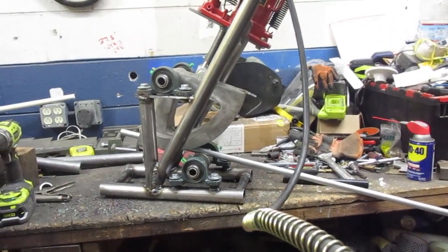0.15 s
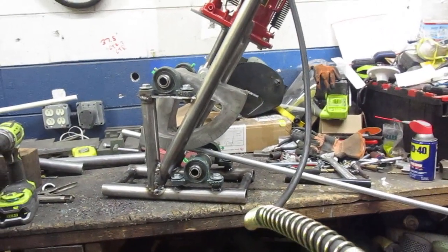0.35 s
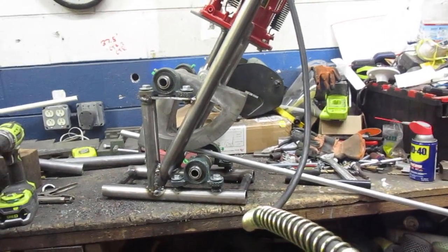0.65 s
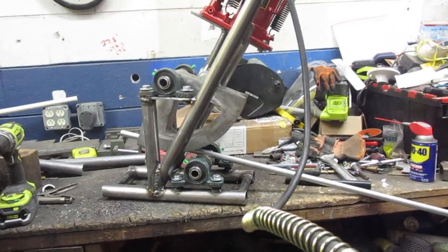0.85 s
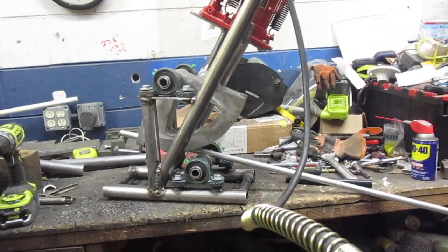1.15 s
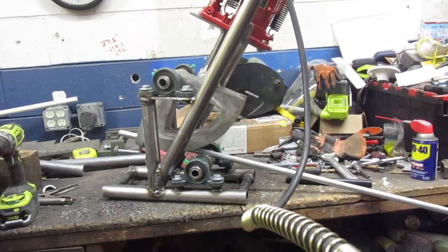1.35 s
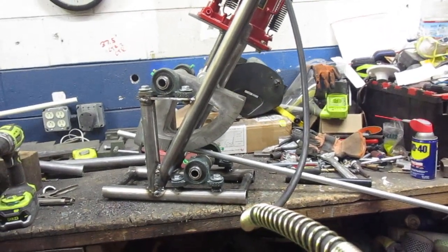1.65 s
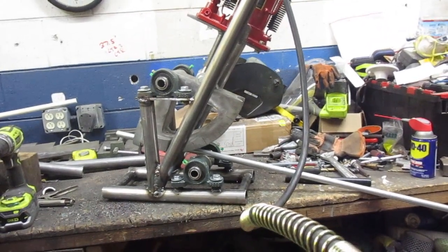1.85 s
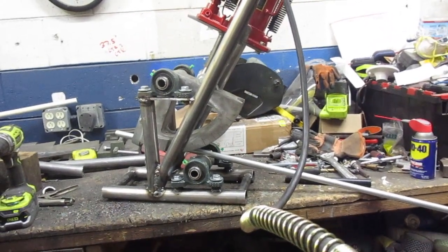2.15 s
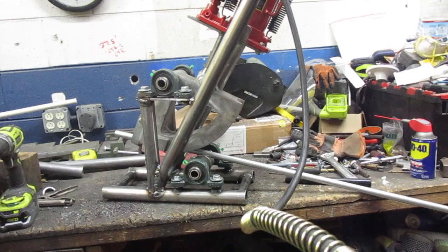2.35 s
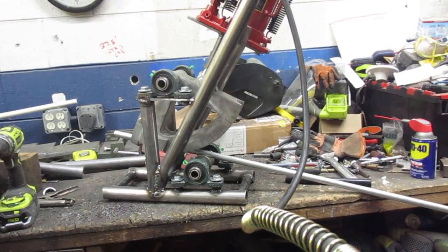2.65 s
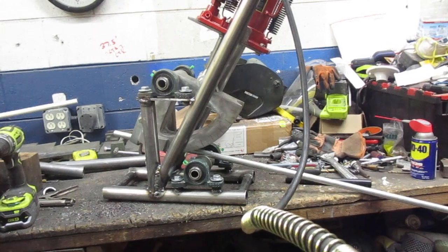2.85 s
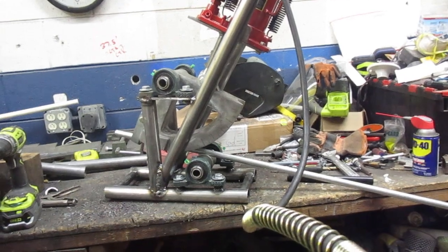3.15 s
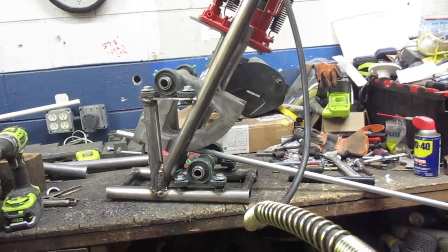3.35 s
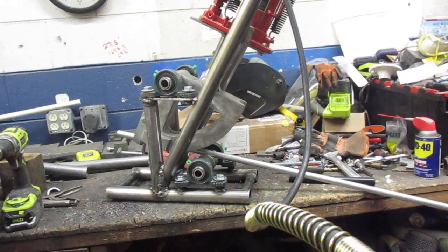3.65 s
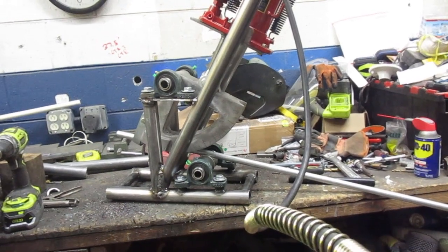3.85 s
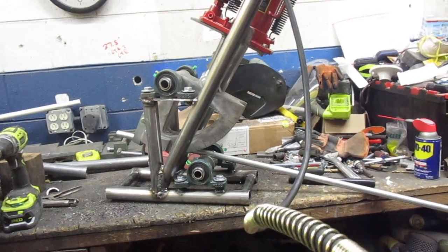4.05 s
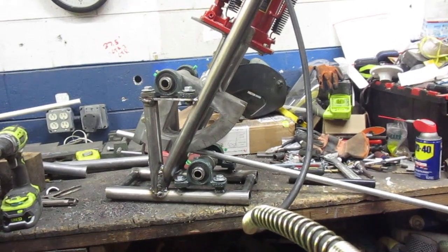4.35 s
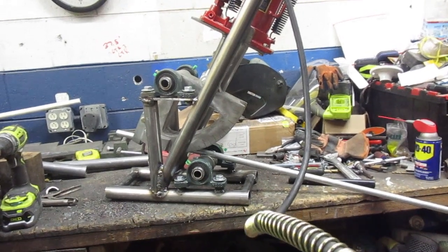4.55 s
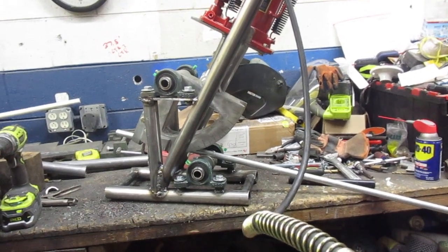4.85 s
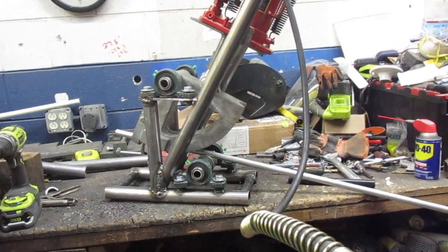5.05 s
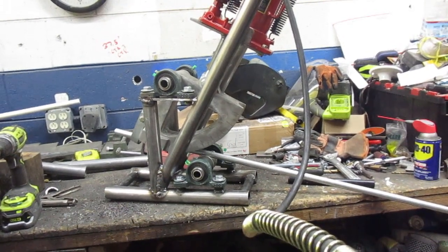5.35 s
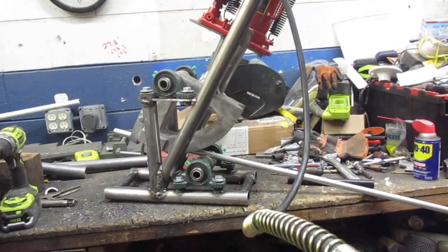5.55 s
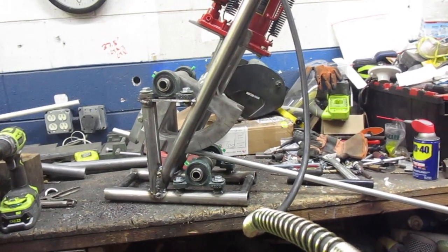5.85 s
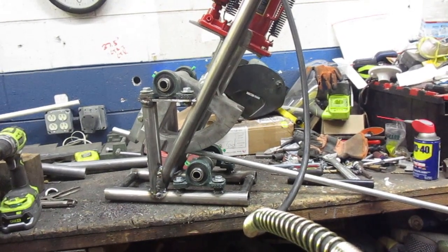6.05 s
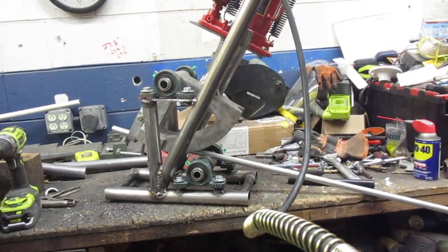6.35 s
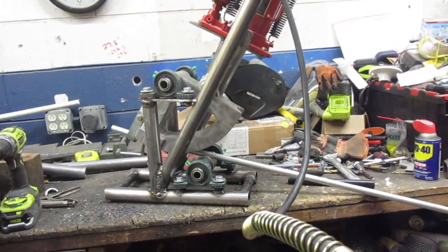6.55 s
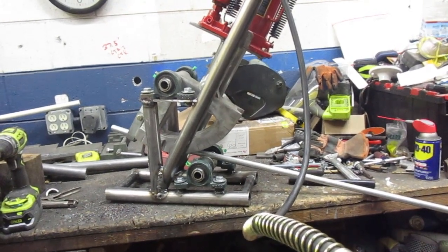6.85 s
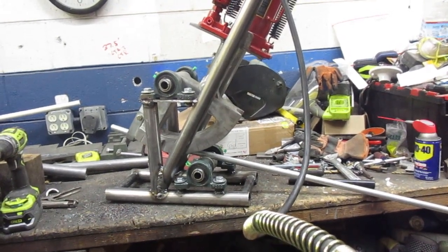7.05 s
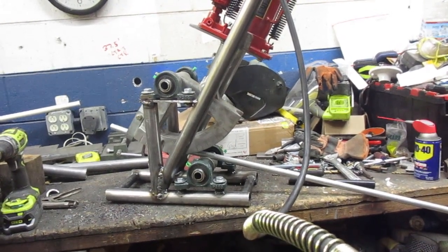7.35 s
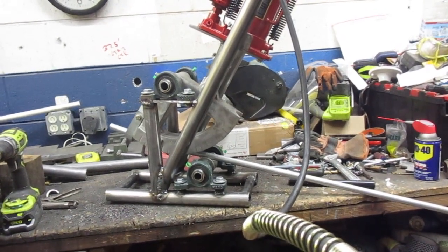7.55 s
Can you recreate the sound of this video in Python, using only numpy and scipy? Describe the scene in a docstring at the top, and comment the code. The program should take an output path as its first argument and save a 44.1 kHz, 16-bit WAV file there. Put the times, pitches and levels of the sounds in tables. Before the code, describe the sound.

An air-driven hydraulic jack pushes steel tube through a bender, firing about fifteen sharp bursts of hiss a second, each with a low thump and light metallic knocks. A valve hisses with a faint, breathy whistle underneath. Just past halfway the pumping stops for a moment, then restarts at nearly the same pace. The workshop reverberates, and spent air buffets the microphone in irregular low puffs.

```python
"""Rapid, thumping bursts of hiss, 15 a second: an air-over-hydraulic jack pushes steel tube through a bender.
Each stroke of its air piston booms, dumps a jet of air and knocks at both ends of its travel.
The feed valve hisses and whistles while the trigger is held; just after 4 s it is let go for a moment.
The workshop reverberates, and spent air drifts over the microphone and buffets it."""
import sys
import numpy as np
from scipy import signal
from scipy.fft import rfft, irfft, next_fast_len
from scipy.io import wavfile

SR = 44100
rng = np.random.default_rng(int(sys.argv[2]) if len(sys.argv) > 2 else 0)


def log_audio(samples):
    """Write samples as a 16-bit WAV file to the path given in sys.argv[1]."""
    # one column per channel
    frames = np.atleast_2d(samples).T
    # limit to full scale, then quantise
    limited = np.clip(frames, -1, 1)
    pcm = np.round(limited * 32767).astype(np.int16)
    wavfile.write(sys.argv[1], SR, pcm)


N = 339570
T = np.arange(N) / SR


def amp(db):
    return 10 ** (np.asarray(db) / 20)


def unit_rms(x):
    return x / np.sqrt(np.mean(x ** 2) + 1e-20)


def curve(rows, t):
    return np.interp(t, *np.transpose(rows))


def log_curve(rows, hz):
    f, value = np.transpose(rows)
    return np.interp(np.log(hz + 1), np.log(f + 1), value)


def add(mix, start_s, sound):
    start = round(start_s * SR)
    sound = sound[max(-start, 0):]
    part = mix[max(start, 0):][:len(sound)]
    part += sound[:len(part)]


def noise(spectrum):
    """Noise of rms 1, shaped by rows of f/Hz, level/dB."""
    size = next_fast_len(N)
    gain = amp(log_curve(spectrum, np.fft.rfftfreq(size, 1 / SR)))
    return unit_rms(irfft(rfft(rng.standard_normal(size)) * gain, size)[:N])


def lowpass(x, hz, order=2):
    return signal.sosfilt(signal.butter(order, min(hz, SR / 2 - 1), fs=SR, output="sos"), x)


def flutter(hz):
    """Random wavering of rms 1, up to the given rate."""
    return unit_rms(lowpass(rng.standard_normal(N), hz))


def ring(modes, detune=0):
    """Decaying modes after one blow; where it lands shifts them slightly."""
    t = np.arange(SR // 4) / SR
    shifts = 1 + detune * rng.standard_normal(len(modes))
    return sum(amp(db - 60 * t / t60) * np.sin(2 * np.pi * hz * shift * t)
               for (hz, db, t60), shift in zip(modes, shifts))


def eddy(t, hz, phase, order=3):
    """One swirl of pressure passing the microphone: about one cycle, energy 1."""
    wave = (np.exp(1j * phase) / (1 + 2j * np.pi * hz * t / order) ** order).real
    return wave / np.linalg.norm(wave)


# trigger pulls: start/s, stop/s
TRIGGER_PULLS = [(0.005, 4.11), (4.5074, 7.69)]
# piston pace: t/s, rate/Hz
STROKE_RATE = [(0, 15.356), (0.7, 15.379), (1.5, 15.46), (4, 15.512), (5.4, 15.158), (7.7, 15.18)]
# driving air pressure: t/s, level/dB
DRIVE_PRESSURE = [(0, 1.5), (.18, -0.8), (.55, 1.5), (.87, -1), (1.2, 1.5), (1.45, 0.5), (1.95, 1.1),
                  (2.65, -0.6), (3.42, 1.25), (3.95, 0.6), (4.1, -1), (4.72, .5), (4.92, -0.8), (5.6, 1.2),
                  (5.9, -2), (6.43, 0.8), (6.72, -1.1), (7.35, 1.2)]
def piston_strokes(scatter_db=0.44):
    """Rows of t/s, level/dB: the piston cycles while the trigger is held, as hard as it is driven."""
    times = []
    for s, stop in TRIGGER_PULLS:
        while s < stop:
            times.append(s)
            s += 1 / curve(STROKE_RATE, s)
    levels_db = curve(DRIVE_PRESSURE, times) + scatter_db * rng.standard_normal(len(times))
    return list(zip(times, levels_db))


# port outflow after opening, typical stroke: t/s, level/dB
PORT_FLOW = [(0, -6), (.0012, -2), (.003, 2.5), (.01, 1), (.02, -0.5), (.027, -5), (.034, -8.5),
             (.045, -53), (.064, -40)]
# jet spectrum: f/Hz, level/dB
JET_SPECTRUM = [(150, -34.5), (500, -14.5), (900, -12.5), (1300, -8), (2000, -5), (2900, -5.5), (3900, -7),
                (5200, -2), (7000, 1.5), (8200, -1), (9800, -6.5), (11000, -0.5), (11800, -2), (12500, -7),
                (15000, -9)]
# lift of the jet's low band: t/s, level/dB
LOW_BAND_LIFT = [(0, 0), (1, -1), (2, -0.5), (3, -1), (4, -1), (4.6, -1.5), (5.5, 2), (6.3, 1.5), (6.9, 2),
                 (7.3, 3), (7.7, 0)]
def exhaust(strokes, level_db=-17, split_hz=3300, lag_s=0.0021, kick_db=7, kick_s=0.0068, snap_db=2.0):
    """Each stroke dumps the cylinder: a turbulent jet that starts sharply and sags as pressure falls."""
    t, flow = np.arange(int(.07 * SR)) / SR, np.zeros(N)
    rested = np.diff([0] + [s for s, db in strokes]) > .2
    draws = rng.standard_normal((len(strokes), 2))
    for (s, db), fresh, (speed, snap) in zip(strokes, rested, draws):
        # the port opens more or less abruptly; after a rest the hose holds full pressure
        onset_db = (snap_db * snap + fresh * kick_db) * np.exp(-t / kick_s)
        add(flow, s, amp(db + onset_db + curve(PORT_FLOW, t * np.exp(0.021 * speed))))
    jet = noise(JET_SPECTRUM)
    low_band = lowpass(lowpass(jet, split_hz)[::-1], split_hz)[::-1]  # zero phase
    slow_flow = lowpass(flow, 1 / (2 * np.pi * lag_s), order=1)  # large eddies take longer to form
    bursts = (jet - low_band) * flow + low_band * slow_flow * amp(curve(LOW_BAND_LIFT, T))
    return bursts * amp(level_db + 0.7 * flutter(hz=430))


# modes of jack, bench and room: f/Hz, level/dB, t60/s
RECOIL_MODES = [(62, -33, .15), (96, -29, .15), (118.6, 4.5, 0.36), (171.1, -7, 0.31), (200, 0, 0.086),
                (253, -5, 0.15), (315, -18, 0.2), (493, -12.5, 0.085), (590, 2.5, 0.015)]
def recoil(strokes, level_db=-37, lead_s=0.00274):
    """The recoil of each stroke excites the same low boom."""
    out, boom = np.zeros(N), ring(RECOIL_MODES)
    for s, db in strokes:
        add(out, s - lead_s, amp(level_db + db) * boom)
    return out


# pump housing modes: f/Hz, level/dB, t60/s
HOUSING_MODES = [(922, -14, 0.03), (1153, -11.5, 0.072), (1416, -7.5, 0.033), (1735, -1, 0.11),
                 (1970, -3, 0.055), (2260, -6, 0.034), (2620, -22, 0.037), (2960, 1.5, 0.039),
                 (4880, -23, 0.078)]
def piston_knocks(strokes, out_db=-38, back_db=-35, out_s=0.00297, back_s=.0235, spread_db=2):
    """The piston knocks on the housing at both ends of its travel."""
    knocks = np.zeros(N)
    for (s, db), (out_force, back_force, late) in zip(strokes, rng.standard_normal((len(strokes), 3))):
        out_knock = amp(db + out_db + spread_db * out_force) * ring(HOUSING_MODES, detune=0.0081)
        back_knock = amp(db + back_db + spread_db * back_force) * ring(HOUSING_MODES, detune=0.0071)
        add(knocks, s + out_s, out_knock)
        add(knocks, s + back_s + 0.000756 * late, back_knock)
    return knocks


# flow through the trigger valve: t/s, level/dB
VALVE_FLOW = [(0, 3.5), (2, -0.5), (4.09, 1), (4.13, -50), (4.45, -50), (4.463, -14), (4.485, -2.5),
              (4.52, 0.5), (6, 1), (7.7, 3.5)]
# valve hiss spectrum: f/Hz, level/dB
VALVE_SPECTRUM = [(300, -11.5), (1600, -9), (2400, 0.5), (3600, -2), (4400, 0), (5500, -1), (7300, -2.5),
                  (8600, -3), (11000, -6), (15000, -29)]
def feed_valve(hiss_db=-36, whistle_db=-41, whistle_hz=4790, width_hz=170):
    """Air hisses through the valve with a breathy whistle while the trigger is held."""
    phase = 2 * np.pi * whistle_hz * T
    whistle = unit_rms(flutter(width_hz / 2) * np.cos(phase) + flutter(width_hz / 2) * np.sin(phase))
    hiss = noise(VALVE_SPECTRUM) * amp(0.5 * flutter(hz=120))
    return (amp(hiss_db) * hiss + amp(whistle_db) * whistle) * amp(curve(VALVE_FLOW, T))


# strong puffs on the microphone: t/s, level/dB, nominal f/Hz
AIR_PUFFS = [(0.026, -25, 390), (0.076, -18, 230), (0.132, -18, 450), (0.268, -29, 220), (0.403, -18, 316),
             (0.667, -15, 297), (0.694, -23, 180), (0.798, -17.5, 190), (0.985, -25, 275),
             (1.322, -23.5, 220), (1.437, -22, 280), (1.64, -21.5, 199), (1.861, -21, 201),
             (1.959, -26, 260), (2.071, -19, 181), (2.183, -28, 246), (2.466, -24, 312), (2.54, -15.5, 270),
             (2.649, -20, 280), (2.844, -23, 168), (3.073, -26.5, 267), (3.474, -28, 200),
             (3.622, -19.5, 259), (3.728, -22, 340), (3.81, -21.5, 179), (3.94, -25.5, 215),
             (4.176, -28.5, 400), (4.189, -24.5, 228), (4.246, -28, 200), (4.305, -30.5, 280),
             (4.336, -29.5, 230), (4.831, -11, 380), (4.985, -20, 297), (5.016, -21, 208),
             (5.087, -17.5, 335), (5.274, -13.5, 190), (5.383, -26, 333), (5.566, -22, 235),
             (5.87, -25.5, 284), (6.09, -22.5, 218), (6.403, -25, 180), (6.609, -21, 189),
             (6.789, -16.5, 357), (6.955, -15.5, 190), (7.236, -17.5, 212), (7.299, -14.5, 236)]
def puffs(level_db=-2, core_ratio=1.13, wake_ratio=0.89, wake_db=-8, wake_s=.006):
    """Each puff is one sharp eddy amid a few slower ones that weaken with distance from it."""
    out, t = np.zeros(N), np.arange(-SR // 16, SR // 16) / SR
    scale = np.sqrt(SR / 100)  # energy of 10 ms at rms 1
    for (s, db, hz), draws in zip(AIR_PUFFS, rng.standard_normal((len(AIR_PUFFS), 5, 3))):
        swirl = eddy(t, core_ratio * hz, np.pi * draws[0, 0])
        for place, (phase, late, pitch) in zip((-1, 1, 2, 3), draws[1:]):
            offset_s = wake_s * place * np.exp(0.252 * late)
            neighbour = eddy(t - offset_s, wake_ratio * hz * np.exp(.3 * pitch), np.pi * phase)
            swirl += amp(wake_db) / np.sqrt(abs(place)) * neighbour
        add(out, s + t[0], amp(db + level_db) * scale * swirl)
    return out


# gusts of spent air: t/s, length/s, level/dB
AIR_GUSTS = [(0, 0.28, -27.5), (0.637, .19, -32), (1.26, .26, -31), (1.818, 0.079, -31), (2.415, 0.15, -30),
             (2.87, .17, -34.5), (3.267, .04, -30), (3.443, 0.22, -29.5), (4.127, 0.22, -35.5),
             (4.395, 0.036, -36), (4.856, 0.22, -33), (5.26, 0.076, -30.5), (5.502, .3, -29.5),
             (7.15, 0.15, -31.5), (7.401, 0.22, -30)]
def air_drift(stir_db=-43, rise_s=0.011, fall_s=0.014):
    """Air strength at the microphone: gusts swell, hold and fade above the running pump's faint stir."""
    running = sum((T > start) & (T < stop) for start, stop in TRIGGER_PULLS)
    power = amp(stir_db) ** 2 * abs(lowpass(running, hz=8.7))
    for s, length_s, db in AIR_GUSTS:
        fade = np.maximum(s - T, 0) / rise_s + np.maximum(T - s - length_s, 0) / fall_s
        power += (amp(db) * np.exp(-np.minimum(fade, 20))) ** 2
    return np.sqrt(power)


def ripples(drift, rate_hz=40, centre_hz=235, spread_db=0.5):
    """Small eddies arrive irregularly, as strong as the drifting air."""
    out, t = np.zeros(N), np.arange(-SR // 32, SR // 32) / SR
    scale = np.sqrt(SR / 100)
    for k, (late, strength, pitch, phase) in enumerate(rng.standard_normal((600, 4))):
        s = (k + .5 * late) / rate_hz
        if 0 <= s < T[-1]:
            swirl = eddy(t, centre_hz * np.exp(0.25 * pitch), np.pi * phase)
            add(out, s + t[0], drift[int(s * SR)] * amp(spread_db * strength) * scale * swirl)
    return out


# draught spectrum: f/Hz, level/dB
DRAUGHT_SPECTRUM = [(10, -30), (25, -5.5), (55, 3.5), (90, 2.5), (160, -3.5), (300, -16), (600, -17.5),
                    (1500, -45)]
def draught(drift, level_db=-3, lumpy_db=3, puff_db=-8, rise_s=0.019, fall_s=0.049):
    """Lumpy rumble of the drifting air, swelling around each strong puff."""
    power = drift ** 2
    for s, db, _ in AIR_PUFFS:
        fade = np.maximum(s - T, 0) / rise_s + np.maximum(T - s, 0) / fall_s
        power += (amp(db + puff_db) * np.exp(-np.minimum(fade, 20))) ** 2
    rumble = noise(DRAUGHT_SPECTRUM) * amp(level_db) * np.sqrt(power)
    return rumble * unit_rms(amp(lumpy_db * flutter(hz=40)))


# reverberation time: f/Hz, t60/s
TAIL_DECAY = [(150, 0.89), (1000, 0.89), (3000, 0.93), (6000, 0.63), (9000, 0.46), (14000, 0.34)]
# reverberation colour: f/Hz, level/dB
TAIL_SPECTRUM = [(300, 1), (1000, 3.5), (2500, 0), (5000, -1.5), (7000, -0.5), (9400, 8), (11200, 0),
                 (13000, 6), (15000, 6.5)]
# bench and wall echoes: delay/s, gain
NEAR_ECHOES = [(.0011, .06), (.0042, .08), (.0062, .05)]
def workshop(x, wet_db=-6, gap_s=.006, tails=8):
    """Near echoes, then a diffuse tail whose treble dies first; its fine pattern slowly shifts."""
    out = x.copy()
    for k in range(tails):
        hz, t, bins = signal.stft(rng.standard_normal(SR), SR, nperseg=256)
        fade_db = log_curve(TAIL_SPECTRUM, hz)[:, None] - 60 * t / log_curve(TAIL_DECAY, hz)[:, None]
        tail = signal.istft(bins * amp(fade_db), SR, nperseg=256)[1]
        crossfade = np.sqrt(2 / tails) * np.cos(np.pi * ((k // 2 + 1) * T + k / 2))
        add(out, gap_s, amp(wet_db) * signal.fftconvolve(x * crossfade, tail / np.linalg.norm(tail)))
    for delay_s, gain in NEAR_ECHOES:
        add(out, delay_s, gain * x)
    return out


# still workshop spectrum: f/Hz, level/dB
ROOM_TONE_SPECTRUM = [(30, -10), (120, 11), (400, -10), (1500, -18), (5000, -27), (15000, -40)]
def room_tone(level_db=-52):
    """Faint, steady low noise of the workshop."""
    return amp(level_db) * noise(ROOM_TONE_SPECTRUM)


def scene():
    """The jack in its room and its spent air on the microphone, mono."""
    strokes, drift = piston_strokes(), air_drift()
    jack = workshop(exhaust(strokes) + feed_valve() + piston_knocks(strokes))
    wind = puffs() + ripples(drift) + draught(drift)
    return (jack + recoil(strokes) + wind + room_tone())[None]


def record(dry):
    """Steep low-pass band limit."""
    edge_hz = 15080
    taps = signal.firwin(601, edge_hz, window=("kaiser", 8), fs=SR)
    return signal.oaconvolve(dry, taps[None], "same")


dry = scene()
out = record(dry)
log_audio(out)
```